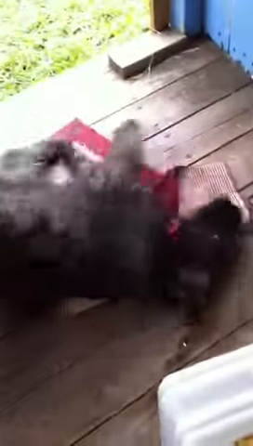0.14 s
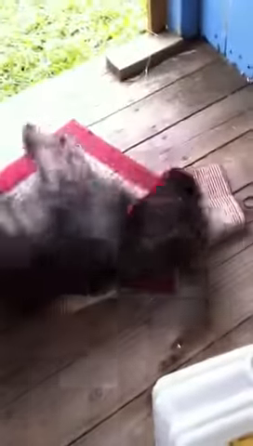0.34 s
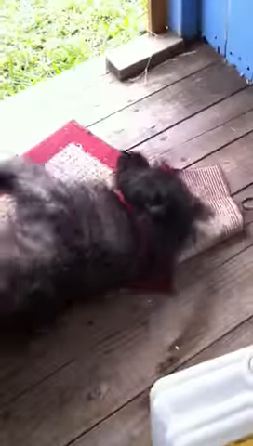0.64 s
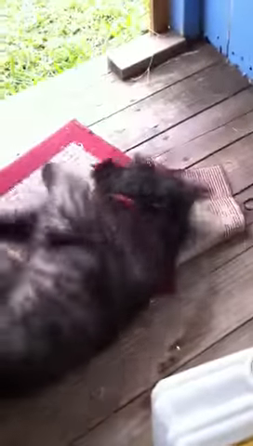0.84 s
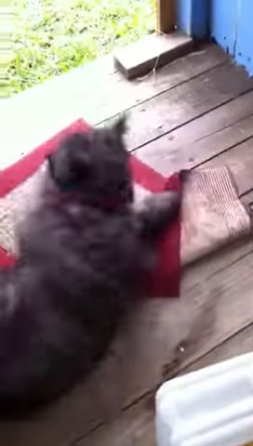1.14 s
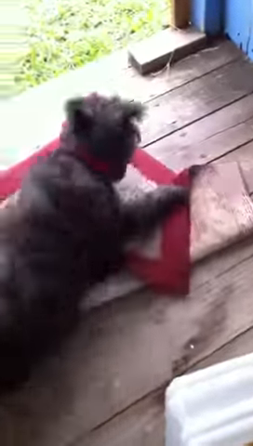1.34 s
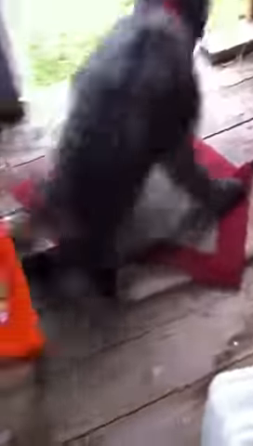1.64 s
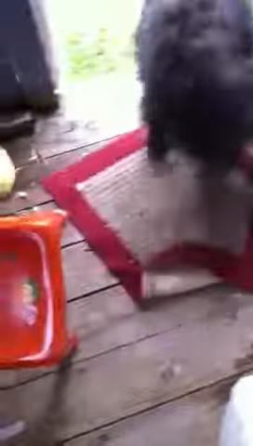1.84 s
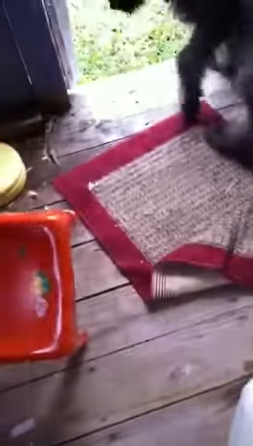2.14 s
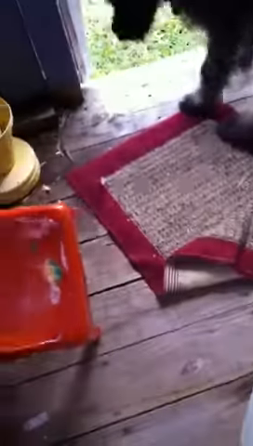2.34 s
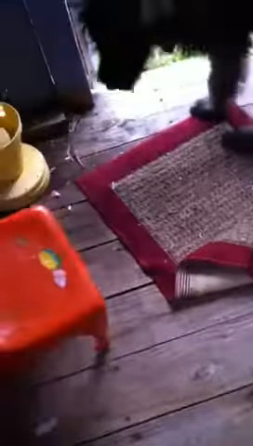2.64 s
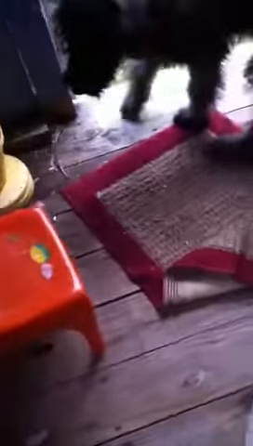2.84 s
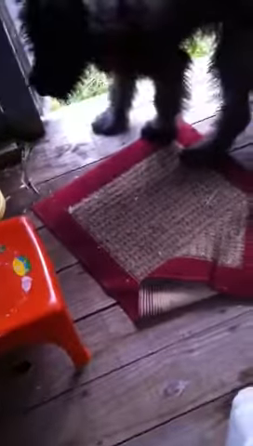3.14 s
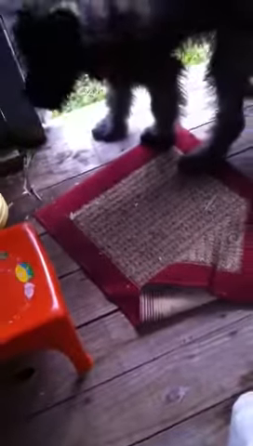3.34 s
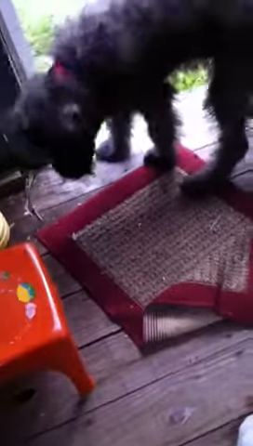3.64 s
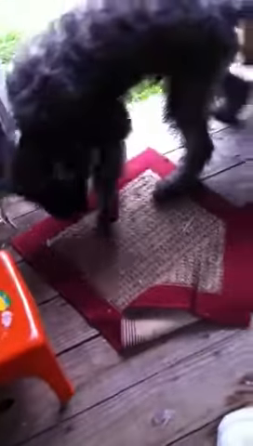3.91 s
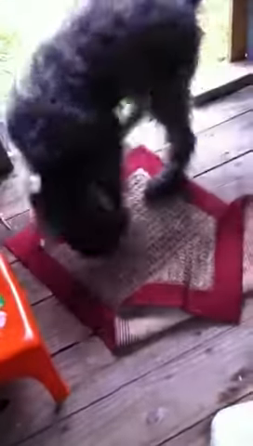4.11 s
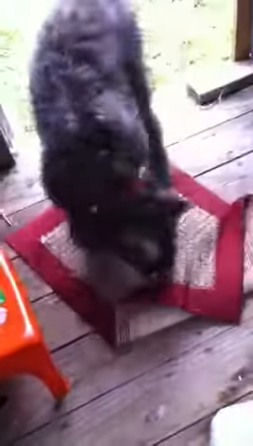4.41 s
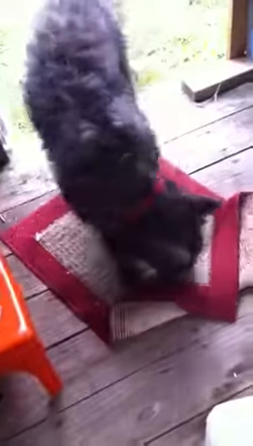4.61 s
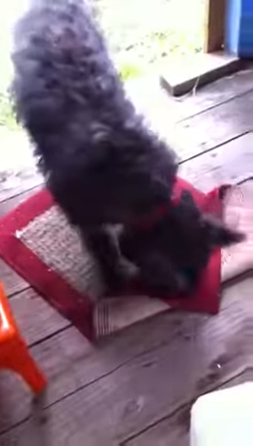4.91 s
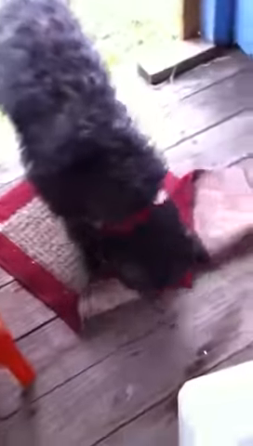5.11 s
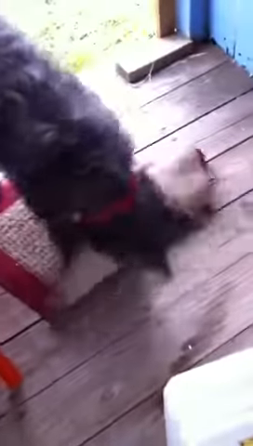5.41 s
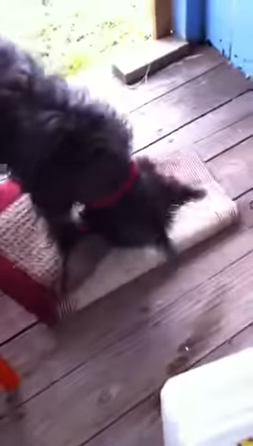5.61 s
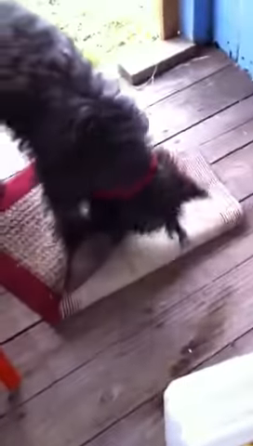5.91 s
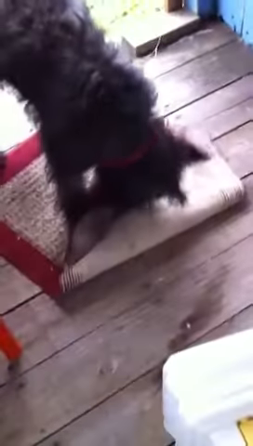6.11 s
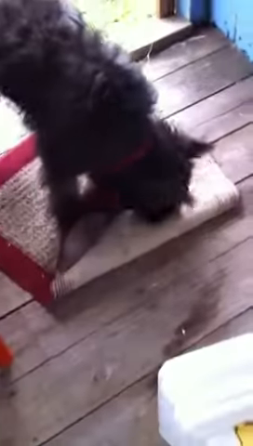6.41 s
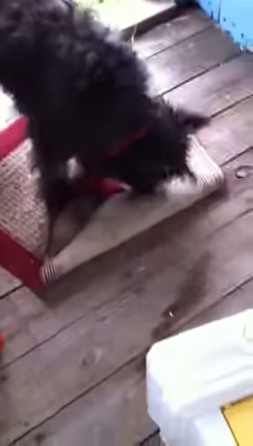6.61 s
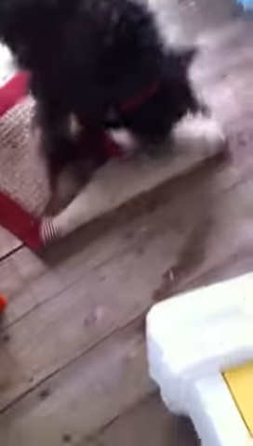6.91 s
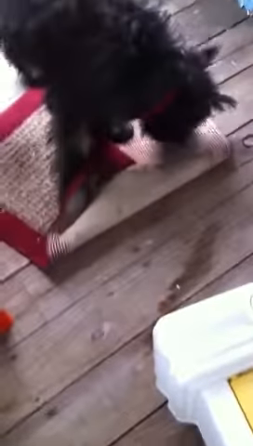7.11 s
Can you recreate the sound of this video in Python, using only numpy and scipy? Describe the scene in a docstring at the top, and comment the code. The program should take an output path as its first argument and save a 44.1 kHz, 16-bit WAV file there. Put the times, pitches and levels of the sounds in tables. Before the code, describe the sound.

Close by, a woven mat scrapes in uneven strokes over porch boards as a puppy's paws thump and its claws scratch, making the wood ring hollowly. The scrabbling pauses briefly, then returns in a short burst with one sharp, loud knock. The rest is much softer: scattered scratches, soft paw steps and mat rustle, fading against a low, steady hush of garden air.

```python
"""A puppy rolls and digs on a woven doormat on a wooden porch, close by, over quiet garden air.
From the start, paws, claws and body knock the planks into ringing; the mat sticks and slips, rasping
and juddering over them. In the first 2 s the puppy's weight also sets the joists booming.
After a lull near 2.5 s comes a flurry with the hardest knock, at 2.9 s.
From about 3.3 s only faint rustling and scuffs are left."""
import sys
import numpy as np
from scipy import signal
from scipy.fft import rfft, irfft, next_fast_len
from scipy.io import wavfile
from scipy.ndimage import uniform_filter1d

SR = 44100
rng = np.random.default_rng(int(sys.argv[2]) if len(sys.argv) > 2 else 0)


def wrap_up_sound(samples):
    """Save the sound to the file named by the first command line argument, as 16-bit audio."""
    columns = np.atleast_2d(samples).T
    # keep every value between -1 and 1, then stretch to whole-number steps
    tamed = np.clip(columns, -1, 1)
    steps = np.round(tamed * 32767).astype(np.int16)
    wavfile.write(sys.argv[1], SR, steps)


N = 319927


def from_db(db):
    """Decibels to gain."""
    return 10 ** (np.asarray(db) / 20)


def unit_rms(x):
    """Scale to unit power."""
    return x / np.sqrt(np.mean(x ** 2) + 1e-20)


def unit_onset(x):
    """Scale to unit power over the first 30 ms."""
    return x / np.sqrt(np.mean(x[:int(.03 * SR)] ** 2) + 1e-20)


def rise(t, tau_s):
    """Exponential attack, 0 to 1."""
    return 1 - np.exp(-t / tau_s)


def decay(t, t60_s):
    """Exponential fall, 60 dB in t60_s."""
    return np.exp(-np.log(1000) * t / t60_s)


def drift(per_s):
    """Slow random curve, unit RMS."""
    position = np.arange(N) / SR * per_s
    return unit_rms(np.interp(position, np.arange(N), rng.standard_normal(N)))


def band(x, edges_hz, order=3):
    """Causal band-pass."""
    return signal.sosfilt(signal.butter(order, edges_hz, "band", fs=SR, output="sos"), x + 1e-18)


def resonance(x, hz, log_half_width):
    """First-order band-pass centred on hz."""
    return band(x, hz * np.exp([-log_half_width, log_half_width]), order=1)


def colour(x, spectrum):
    """Filter by a (frequency [Hz], gain [dB]) outline."""
    hz, db = np.transpose(spectrum)
    size = next_fast_len(len(x))
    bins_hz = np.maximum(np.arange(size // 2 + 1) * SR / size, 1)
    gain = from_db(np.interp(np.log(bins_hz), np.log(hz), db))
    return irfft(rfft(x, size) * gain, size)[:len(x)]


def ring(force, hz, t60_s):
    """One damped mode."""
    radius, angle = decay(1 / SR, t60_s), 2 * np.pi * hz / SR
    return signal.lfilter([0, np.sin(angle)], [1, -2 * radius * np.cos(angle), radius ** 2], force + 1e-18)


def slips(samples, per_s, spread_db):
    """Random catches of claws and fibres: impulses of uneven size."""
    sizes = from_db(spread_db * np.minimum(rng.exponential(1, samples), 4))
    return (rng.random(samples) < per_s / SR) * sizes * rng.choice([-1, 1], samples)


# Garden air spectrum: (frequency [Hz], relative density [dB])
AIR_SPECTRUM = [(18, -85), (30, -46), (124, -2), (204, -3.5), (311, -8.5), (512, -14), (1100, -22),
                (2230, -23), (3980, -25), (16000, -31)]

def garden_air(level_db=-63, waver_db=0.54):
    """Low, steady noise, wavering slightly."""
    noise = unit_rms(colour(rng.standard_normal(N), AIR_SPECTRUM))
    return noise * from_db(level_db + waver_db * drift(per_s=2.0))


def porch_echoes(dry, wet_db=-8.5, t60_s=0.08, lowpass_hz=5000, delay_s=.009):
    """Walls and roof add a short, dull scatter of echoes."""
    t = np.arange(SR // 2) / SR
    echoes = rng.standard_normal(len(t)) * decay(t, t60_s) * (t > delay_s)
    lowpass = signal.butter(1, lowpass_hz, fs=SR, output="sos")
    echoes = signal.sosfilt(lowpass, echoes / np.linalg.norm(echoes))
    return dry + from_db(wet_db) * signal.fftconvolve(dry, echoes)[:N]


# Full body weight coming down: (time [s], level [dB])
BODY_DROPS = [(0.114, -40), (1.337, -41), (1.438, -41.5), (1.742, -35.5), (1.93, -40.5), (2.057, -38)]

def joists(mode_hz=116.4, t60_s=0.17, push_s=0.0034):
    """A slow push rings the lowest mode of the deck."""
    t, out = np.arange(N) / SR, np.zeros(N)
    for start_s, db in BODY_DROPS:
        age_s = np.maximum(t - start_s, 0)
        envelope = from_db(db - 60 * np.minimum(age_s / t60_s, 2)) * rise(age_s, push_s)
        out += envelope * np.sin(2 * np.pi * mode_hz * age_s)
    return out


# Porch plank modes: (frequency [Hz], gain [dB], T60 [s])
PLANK_MODES = [(185.3, -1, 0.13), (190.3, -1.5, 0.15), (250.4, 10.5, 0.039), (288, 0.5, 0.04),
               (441.9, 1, 0.27), (480, 2, 0.11), (559, 9, 0.042), (656, -1, 0.091), (815, -8, 0.038),
               (1054, -4.5, 0.048), (1156, -5, 0.06), (1240, -7.5, 0.072), (1400, -10, 0.083),
               (1750, -10.5, 0.095)]

def plank(force, spread_db, detune=0.02):
    """One driven plank; each has its own random mode strengths, signs and pitches."""
    out = 0
    for hz, db, t60_s in PLANK_MODES:
        strength, sign, shift = rng.standard_normal(3)
        gain = np.sign(sign) * from_db(db + spread_db * strength)
        out += gain * ring(force, hz * np.exp(detune * shift), t60_s)
    return out


# Soft rustling noise, strong during rolling, then faint, swelling slightly at 3-3.5 s:
# (time [s], level [dB])
SOFT_RUSTLE = [(0, -59.5), (2.25, -56.5), (2.45, -68), (3.0, -64), (3.5, -66.5), (3.75, -77), (6.1, -70.5),
               (7.25, -72.5)]
# Mat and fur dragged over the planks:
# (start [s], length [s], rasp [dB], judder and drone re rasp [dB], hiss re rasp [dB], swell [dB])
MAT_STROKES = [(0, 0.13, -53, 2, -10, 0), (0.259, 0.27, -57, 0.5, -5, 7), (0.499, .11, -54.5, -3, -5.5, -1),
               (0.707, 0.078, -47, 14, -11, -0.5), (0.817, 0.069, -50.5, 13, -8.5, 5),
               (0.881, .15, -43.5, 7.5, -8, 1), (1.012, 0.37, -62.5, 13, -22, -21),
               (1.276, 0.13, -52.5, 5, -6.5, 6), (1.45, 0.11, -41.5, 2, -8, 3.5),
               (1.551, 0.073, -42, 4.5, -1, -0.5), (1.72, 0.038, -51.5, 14, 2.5, 8),
               (1.784, 0.089, -54.5, 7, -26, -1), (1.91, 0.059, -58, 19.5, -2.5, -8),
               (2.02, 0.061, -48.5, -0.5, -4.5, 11.5), (2.085, 0.23, -52, -4.5, -6, -5.5),
               (2.265, 0.03, -54, 12.5, -21, -6), (2.728, 0.071, -53.5, 5.5, -3.5, 19.5),
               (2.856, 0.03, -34, -0.5, -13, 3.5), (2.961, 0.027, -52.5, 12, -11, 17.5),
               (3.043, 0.082, -47, 10, -9.5, -5.5), (3.128, 0.1, -57, 4, -6.5, -11),
               (4.152, 0.25, -64, -4, -3, 12), (4.632, 0.033, -64.5, -6, -7, -3),
               (4.77, 0.087, -69, -4.5, -7, 4.5), (5.124, .29, -62, 1.5, -2.5, 14.5),
               (5.217, 0.021, -64.5, -6, 3, -9), (5.432, 0.17, -67.5, 2, -3, 1),
               (5.766, 0.2, -70, -0.5, 2.5, -7)]

def stroke_gains(grip_s=0.001, release_s=0.033, rustle_bands_db=(-3, -3.5, -5, -4.5)):
    """Judder, drone, rasp and hiss gains: over the rustle, each stroke grips, swells or sags, and dies."""
    t = np.arange(0, N, 32) / SR
    rustle = from_db(np.interp(t, *np.transpose(SOFT_RUSTLE)))
    power = np.outer(from_db(rustle_bands_db), rustle) ** 2
    for start_s, length_s, db, pressure_db, hiss_db, swell_db in MAT_STROKES:
        age_s = np.maximum(t - start_s, 0)
        envelope = rise(age_s, grip_s) * np.exp(-np.maximum(age_s - length_s, 0) / release_s)
        envelope *= from_db(db + swell_db * (np.minimum(age_s / length_s, 1) - .5))
        power += np.outer(from_db([pressure_db, pressure_db, 0, hiss_db]), envelope) ** 2
    return [np.interp(np.arange(N) / SR, t, gain) for gain in np.sqrt(power)]


# Bands of mat judder, drone, rasp, hiss and of paw thump, knock, clack, tick: (low [Hz], high [Hz])
BANDS = [(135, 340), (340, 800), (800, 3500), (3500, 17000)]
# Weave friction spectrum: (frequency [Hz], relative density [dB])
WEAVE_SPECTRUM = [(100, 4), (1300, -0.5), (3000, -5), (5500, -6), (9500, -9), (12500, -11.5),
                  (16000, -14.5)]

def mat(trim_db=-1.0, fibre_db=(-12, -7, 12, 24), jerk_db=1.0, load_db=8.0, plank_changes_per_s=7.4):
    """The weave sticks and slips on wood: it rasps, and drives one plank after another."""
    force = slips(N, per_s=3000, spread_db=-1.0) * from_db(jerk_db * drift(per_s=64))
    modes, out = np.zeros(N), np.zeros(N)
    for _ in range(3):
        load = from_db(load_db * drift(plank_changes_per_s))
        modes += plank(force * load, spread_db=1.0, detune=.04)
    fibres = colour(force, WEAVE_SPECTRUM)
    for edges_hz, db, gain in zip(BANDS, fibre_db, stroke_gains()):
        part = unit_rms(band(modes, edges_hz)) + from_db(db) * unit_rms(band(fibres, edges_hz))
        running_rms = np.sqrt(np.abs(uniform_filter1d(part ** 2, size=3600)) + 1e-9)
        out += gain * part / running_rms   # paw pressure sets the level
    return from_db(trim_db) * out


# Scratches on the weave: (time [s], length [s], level [dB], resonance [Hz])
WEAVE_SCRATCHES = [(0.117, 0.017, -58, 2260), (0.487, 0.014, -51.5, 1560), (0.681, 0.023, -47.5, 2070),
                   (0.747, 0.0091, -43, 2170), (1.005, 0.019, -37.5, 1660), (1.101, 0.0091, -35.5, 3360),
                   (1.502, 0.014, -44, 2680), (2.074, 0.016, -45, 1500), (2.87, .011, -39, 1750),
                   (3.844, 0.012, -64, 1400), (4.042, 0.035, -60, 1820), (4.386, 0.019, -52.5, 1650),
                   (5.753, 0.02, -57.5, 1290)]

def scratches(grit_db=-8.5, attack_s=0.0019, release_s=0.015):
    """Catches on the weave briefly ring one hollow resonance, over broad grit."""
    t, out = np.arange(SR // 4) / SR, np.zeros(N + SR)
    for start_s, length_s, db, hz in WEAVE_SCRATCHES:
        force = slips(len(t), per_s=1500, spread_db=-2.0)
        hollow = unit_rms(resonance(force, hz, 0.082))
        grit = unit_rms(band(colour(force, WEAVE_SPECTRUM), [800, 6000], order=1))
        envelope = rise(t, attack_s) * np.exp(-np.maximum(t - length_s, 0) / release_s)
        start = int(start_s * SR)
        out[start:start + len(t)] += from_db(db) * envelope * unit_rms(hollow + from_db(grit_db) * grit)
    return out[:N]


# Dense upper ringing of wood: (frequency [Hz], relative density [dB])
WOOD_SPECTRUM = [(100, 8.5), (1200, -5.5), (2200, -12), (3500, -16.5), (6000, -20.5), (10000, -26),
                 (16000, -36)]

def skid(t, contact_s, grit_db=(-9, -9, 1, 16), linger_ratio=(1.6, 1.6, 1.7, 1.3),
         tail_db=-0.5, tail_s=(.021, .021, .02, .015)):
    """A paw lands and skids: the plank rings, the claws crackle. One signal per band."""
    attack = rise(t, contact_s / 3)
    force = slips(len(t), per_s=1600, spread_db=3.0) * attack * np.exp(-t / (0.66 * contact_s))
    force[0] += 2.5   # first touch strikes all modes at once
    modes = plank(force, spread_db=2.0)
    grit = colour(slips(len(t), per_s=4000, spread_db=1.0), WOOD_SPECTRUM) * attack
    parts = []
    for k, edges_hz in enumerate(BANDS):
        envelope = np.exp(-t / (linger_ratio[k] * contact_s)) + from_db(tail_db) * np.exp(-t / tail_s[k])
        crackle = unit_onset(band(grit * envelope, edges_hz))
        parts.append(unit_onset(band(modes, edges_hz, order=2)) + from_db(grit_db[k]) * crackle)
    return parts


def blow(bands_db, note_hz, contact_s, note_db=2.0, bend_db=1.5, bend_ratio=.47):
    """One impact: the knock centres on the struck plank's note, the thump on its low bending note."""
    t = np.arange(SR // 2) / SR
    thump, knock, clack, tick = skid(t, contact_s)
    bend_hz = bend_ratio * note_hz
    bend = np.sin(2 * np.pi * bend_hz * t) * rise(t, contact_s / 3) * decay(t, t60_s=0.069)
    bend = unit_onset(band(bend, BANDS[0], order=2))
    thump = unit_onset(resonance(thump, bend_hz, .26)) + from_db(bend_db) * bend
    note = np.sin(2 * np.pi * note_hz * t) * rise(t, contact_s / 2) * decay(t, t60_s=0.045)
    note = unit_onset(band(note, BANDS[1], order=1))
    knock = unit_onset(resonance(knock, note_hz, .26)) + from_db(note_db) * note
    bright_db = np.clip(bands_db[3] - bands_db[2] + 11.0, -2, 7)   # claws snap brighter than pads
    tick = colour(tick, [(4000, 0), (10000, bright_db)])
    return sum(from_db(db) * unit_onset(part) for db, part in zip(bands_db, (thump, knock, clack, tick)))


# Paws and body on the planks:
# (time [s], knock [dB], thump re knock [dB], clack re knock [dB], plank note [Hz], contact [s])
KNOCKS = [(0.118, -27, 2.5, 0.5, 619, 0.0084), (0.686, -30.5, -4.5, -9, 495, 0.013),
          (0.745, -33, -1, -17, 457, 0.017), (0.784, -35.5, -4, -22, 440, 0.0042),
          (0.809, -29, 1.5, -23, 490, 0.0085), (0.9, -28.5, -5, -16.5, 483, 0.0044),
          (0.932, -31, 1, -7.5, 456, 0.0042), (0.965, -32, -4, -27.5, 517, .004),
          (1.066, -35, -15.5, -18, 480, .009), (1.13, -23.5, -16.5, -12, 498, 0.0067),
          (1.201, -41.5, -6, -28, 482, 0.0028), (1.307, -40, -12, -7, 524, 0.01),
          (1.438, -23.5, -6.5, 0, 585, 0.0042), (1.517, -33.5, -2.5, -8, 552, 0.0091),
          (1.58, -34, -2, 1.5, 542, 0.0051), (1.712, -36.5, -12, -9, 490, .009),
          (1.739, -34, 3, -21, 392, 0.0057), (1.796, -35.5, -17, -17, 480, 0.0048),
          (1.819, -34.5, -32, -14, 614, 0.0037), (1.894, -37.5, -1, 8, 544, 0.0064),
          (2.057, -38.5, 1, -7.5, 430, 0.007), (2.257, -35.5, -16, -14.5, 602, 0.004),
          (2.69, -26, -7.5, -9, 540.6, 0.0063), (2.785, -29.5, -18.5, -5, 590, 0.0068),
          (2.857, -30.5, -9, -6, 466, 0.0072), (2.908, -13.5, -11, -15, 440, 0.0055),
          (2.969, -29, -4, -29, 440, 0.0049), (2.993, -34.5, -4, -5.5, 440, .008),
          (3.052, -26.5, -8.5, -32, 440, 0.012), (4.566, -56.5, -3.5, -5.5, 400, .006),
          (5.205, -54, -16, -13, 428, 0.0092), (5.524, -57, 4, -4.5, 557, 0.004),
          (5.661, -62, -8, -3, 522, 0.0093), (5.752, -56.5, -1, 3, 466, 0.012)]
# Soft pads set down: (time [s], level [dB])
PADS = [(0.109, -38), (0.845, -48), (1.414, -29.5), (1.94, -33), (2.012, -42), (2.418, -48.5), (4.056, -56),
        (4.335, -45.5), (4.645, -55), (5.391, -53)]
# Claws catching and snapping free: (time [s], level [dB])
CLAWS = [(1.105, -42.5), (1.129, -27), (2.016, -54), (2.864, -43), (2.888, -42.5), (5.1, -59.5)]
PAD_BANDS_DB, PAD_NOTE_HZ, PAD_CONTACT_S = (0.5, -18, -17, -29.5), 440, 0.0059
CLAW_BANDS_DB, CLAW_NOTE_HZ, CLAW_CONTACT_S = (-14, -16.5, -1, -3.5), 426, 0.0035

def paws(tick_db=-27.5, tick_db_per_db=0.67, sway_db=-10.0, sway_hz=(75, 135)):
    """Body, pads and claws strike the planks; blows both heavy and hard also sway the deck."""
    contacts = []
    for start_s, db, weight_db, hard_db, note_hz, contact_s in KNOCKS:
        clack_db = db + hard_db
        bands_db = [db + weight_db, db, clack_db, tick_db + tick_db_per_db * clack_db]
        contacts.append((start_s, bands_db, note_hz, contact_s))
    contacts += [(s, np.add(db, PAD_BANDS_DB), PAD_NOTE_HZ, PAD_CONTACT_S) for s, db in PADS]
    contacts += [(s, np.add(db, CLAW_BANDS_DB), CLAW_NOTE_HZ, CLAW_CONTACT_S) for s, db in CLAWS]
    out = np.zeros(N + SR)
    for start_s, bands_db, note_hz, contact_s in contacts:
        hit = blow(bands_db, note_hz, contact_s)
        t = np.arange(len(hit)) / SR
        sway = unit_rms(band(rng.standard_normal(len(t)), sway_hz, order=1))
        sway *= rise(t, 0.0065) * np.exp(-t / 0.02)
        drive_db = min(bands_db[0], bands_db[2])   # weaker of thump and clack
        start = int(start_s * SR)
        out[start:start + len(t)] += hit + from_db(sway_db + drive_db) * sway
    return out[:N]


def scene():
    """Garden air behind puppy and mat on the porch; mono."""
    air = garden_air()
    puppy = paws() + joists() + mat() + scratches()
    return (air + porch_echoes(puppy))[None]


def record(dry, cutoff_hz=15900):
    """Steep low-pass."""
    return signal.sosfilt(signal.ellip(10, .1, 80, cutoff_hz, fs=SR, output="sos"), dry)


dry = scene()
out = record(dry)
wrap_up_sound(out)
```